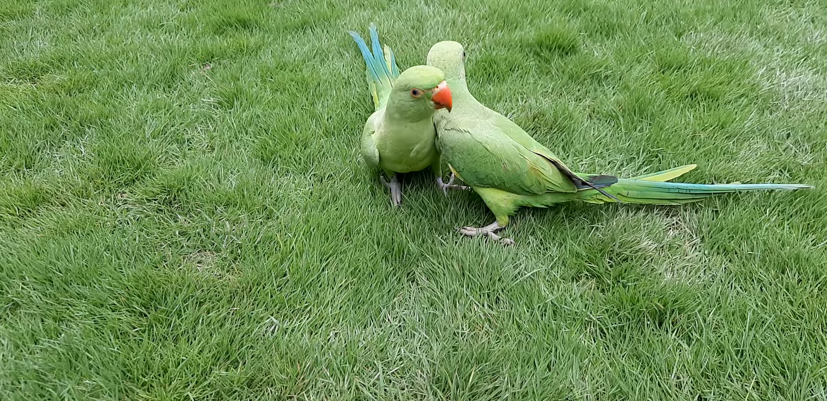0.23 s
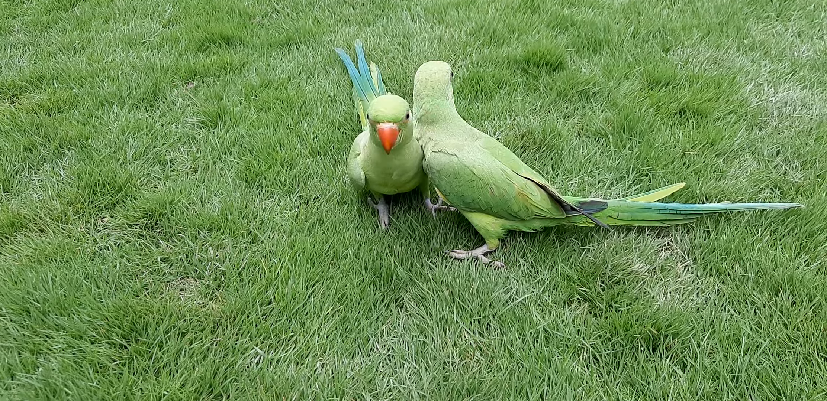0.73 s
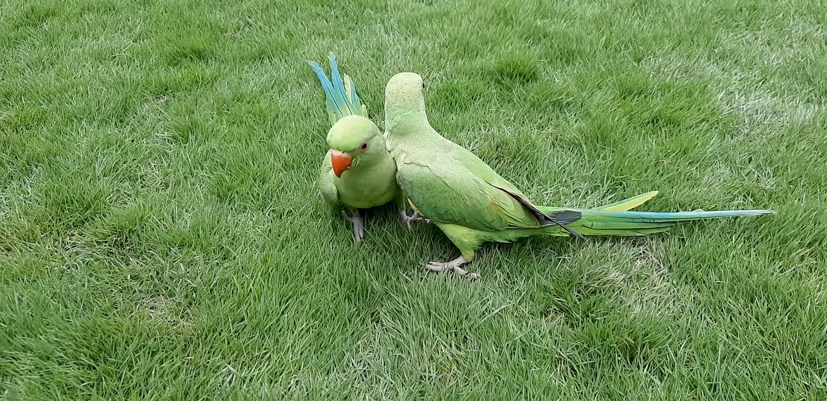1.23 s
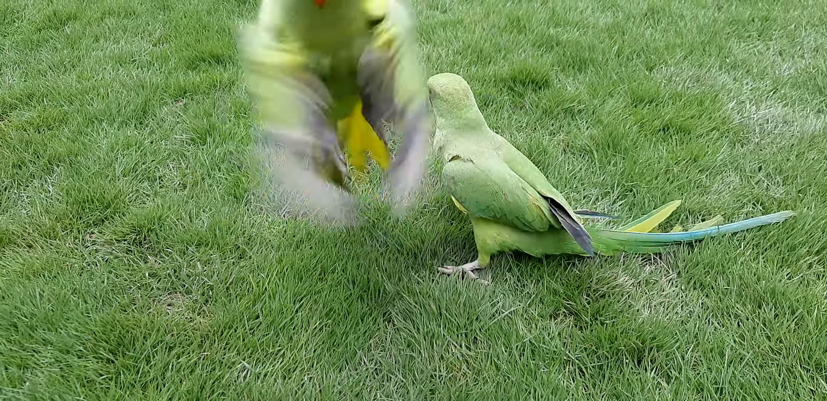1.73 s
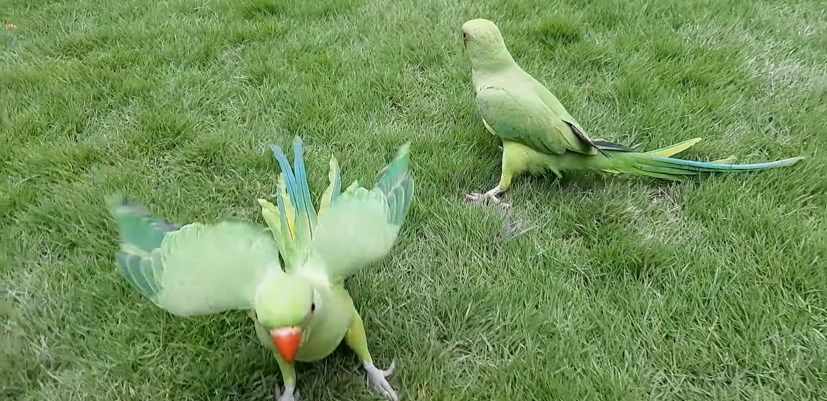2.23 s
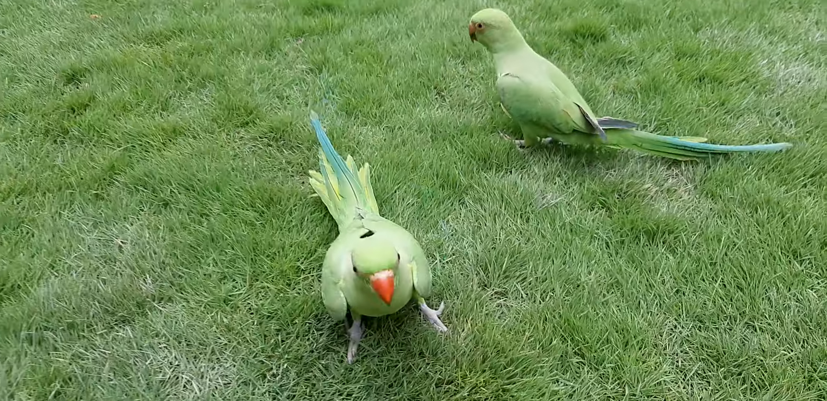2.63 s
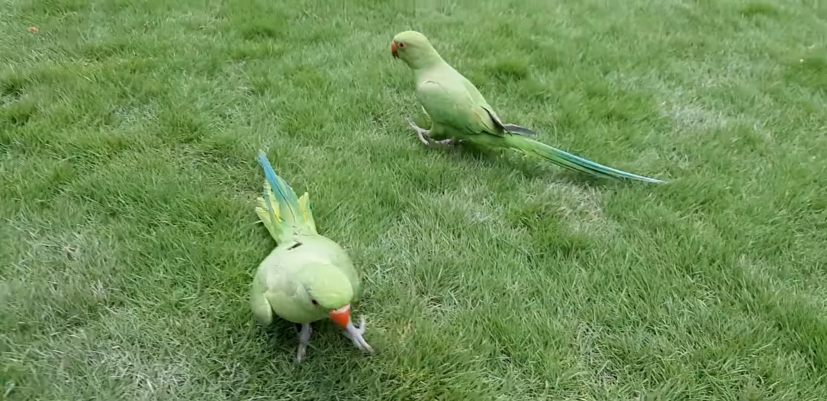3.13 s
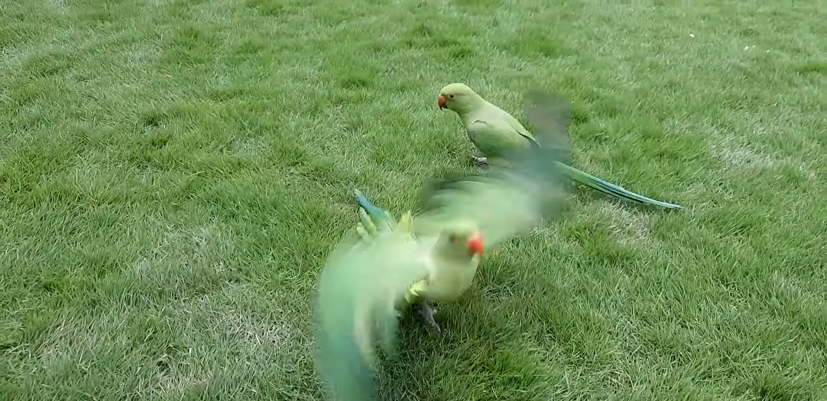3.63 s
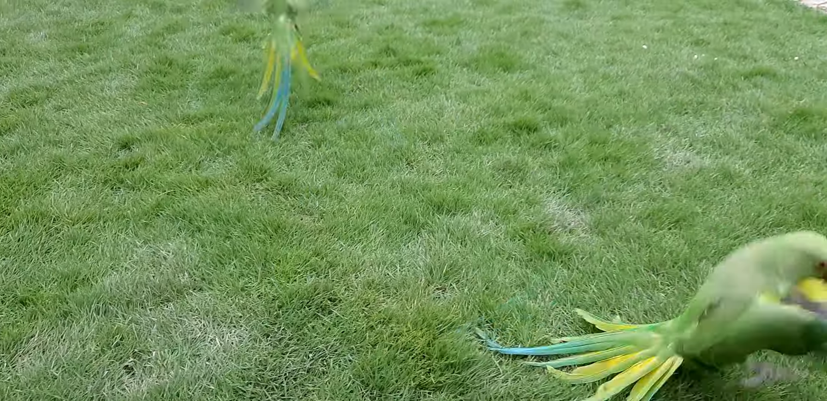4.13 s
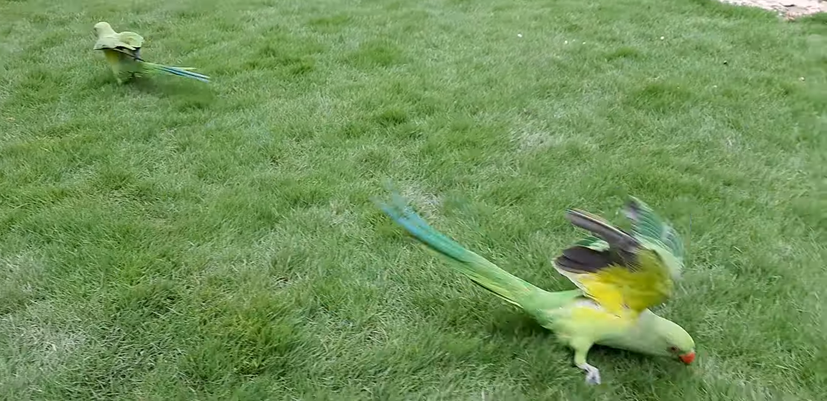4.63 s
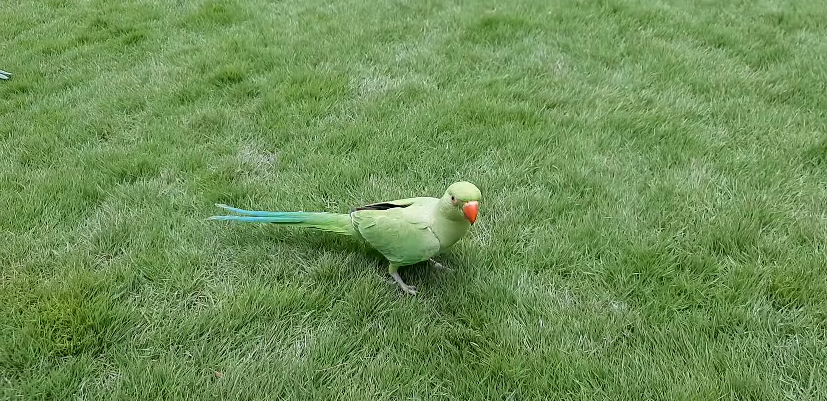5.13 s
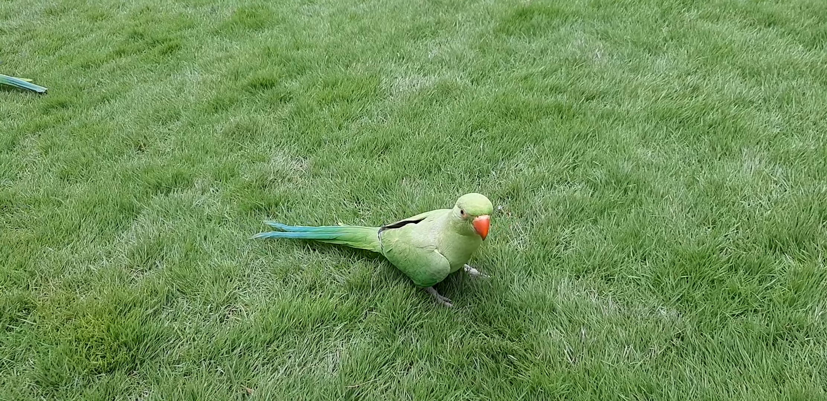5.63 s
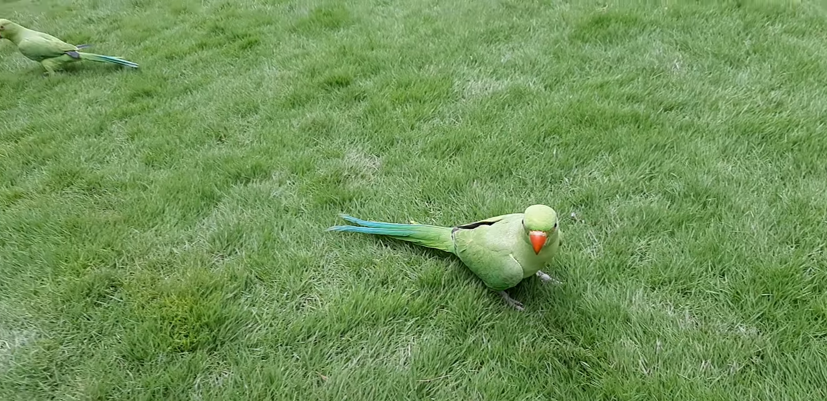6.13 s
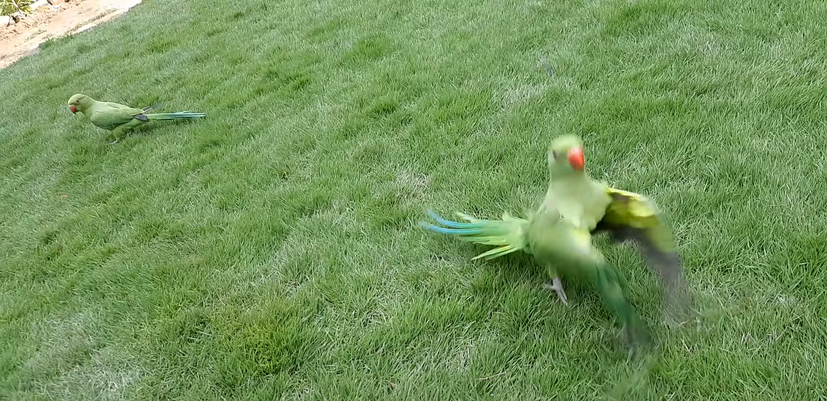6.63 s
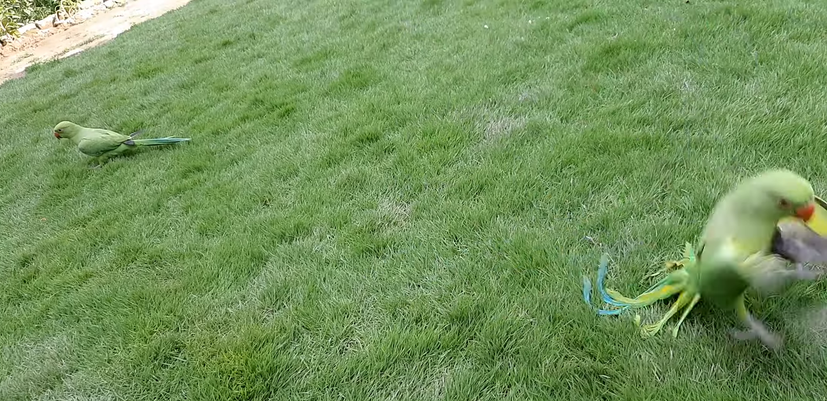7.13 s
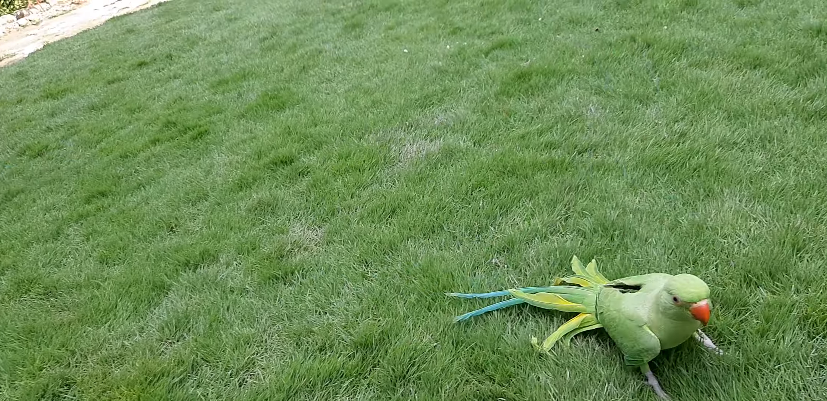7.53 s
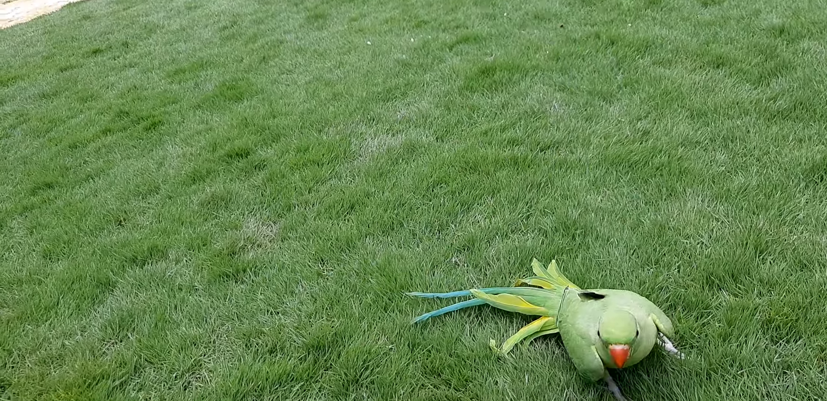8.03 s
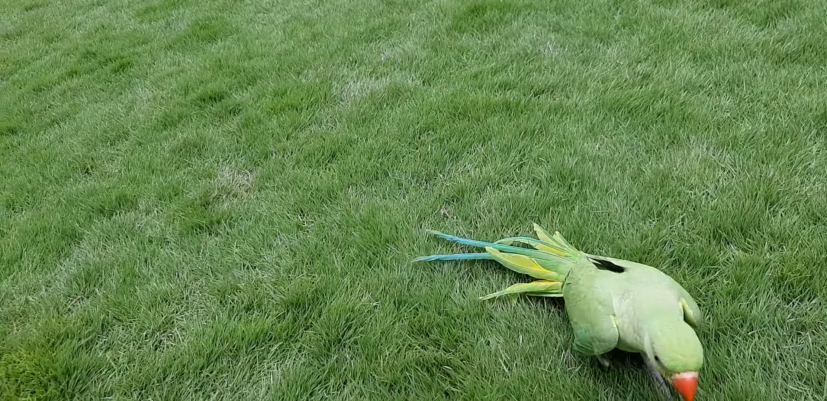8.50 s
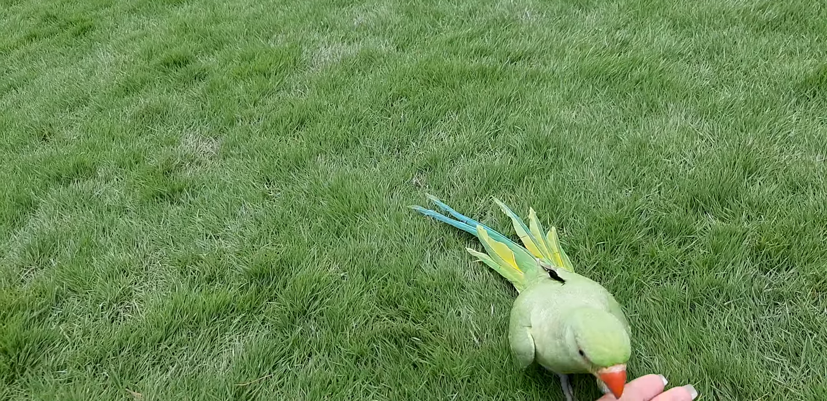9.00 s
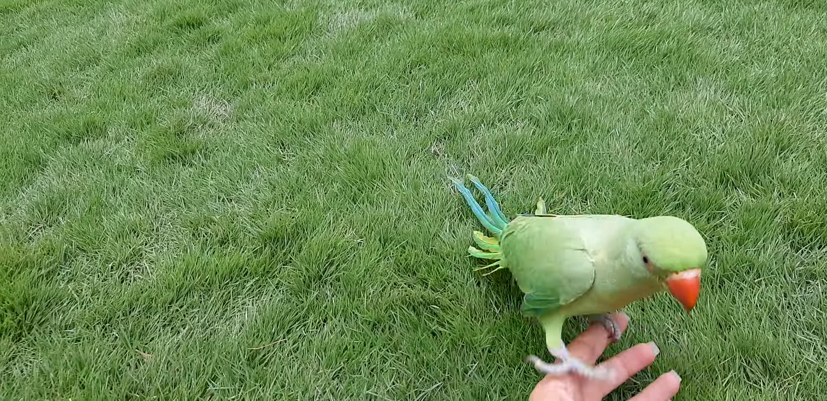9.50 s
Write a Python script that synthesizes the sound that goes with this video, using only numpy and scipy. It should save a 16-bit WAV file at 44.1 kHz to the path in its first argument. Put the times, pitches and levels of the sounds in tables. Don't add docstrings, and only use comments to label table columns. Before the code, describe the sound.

Parakeet wings clap sharply in three short flights over a lawn, with two brief raspy whistled calls above a steady machine hiss and whine.

```python
import sys
import numpy as np
from scipy import signal
from scipy.fft import rfft, irfft
from scipy.io import wavfile
from scipy.ndimage import uniform_filter1d

SR = 44100
rng = np.random.default_rng(int(sys.argv[2]) if len(sys.argv) > 2 else 0)


def transcribe(u):
    v = np.clip(np.atleast_2d(u).T, -1, 1)
    q = np.round(v * 32767).astype(np.int16)
    wavfile.write(sys.argv[1], SR, q)


def gain_from_db(level_db):
    decades = np.asarray(level_db, float) / 20
    return 10 ** decades


N = 430416
T = np.arange(N) / SR
HZ = np.fft.rfftfreq(N, 1 / SR) + 1e-3
MACHINE_LAG, WING_LAG, CALL_LAG = 20, 9, -14
WHINE_LAG = 11.5


def on_log(points, hz=HZ):
    return np.interp(np.log(hz), np.log([p[0] for p in points]), [p[1] for p in points])


def band(x, lo_hz, hi_hz):
    y = signal.sosfilt(signal.butter(2, [lo_hz, min(hi_hz, .45 * SR)], "band", fs=SR, output="sos"), x)
    return y / np.std(y)


def noise_band(lo_hz, hi_hz):
    return band(rng.standard_normal(N), lo_hz, hi_hz)


def walk(rate):
    count = int(T[-1] * rate) + 2
    y = np.interp(T * rate, np.arange(count), rng.standard_normal(count))
    return y / np.std(y)


def add(out, s, sound):
    i = int(s * SR)
    out[..., i:i + sound.shape[-1]] += sound[..., :N - i]


# frequency in Hz, left minus right in dB.
LEFT_SHADE = [(60, -0.5), (300, 0), (700, -1), (1300, -1), (2400, -4), (4400, -7.5), (8100, -11),
              (15000, -5.5)]


def shade(x, lag, share, points=LEFT_SHADE):
    left = rfft(x) * np.exp(-2j * np.pi * HZ * lag / SR) * gain_from_db(share * on_log(points))
    return np.array([irfft(left, N), x])


# time in seconds, peak in dB, left minus right in
# dB, low slap in dB, time to fade by 60 dB in seconds.
BEATS = [(1.7195, -7.5, -7, -37, .017), (1.7966, -7, -11, -28, .016), (1.877, -12, -2, -34, 0.024),
         (1.955, -17, -2, -34.5, 0.025), (2.032, -14, -4, -37.5, 0.013),
         (3.7263, -11.5, -2.5, -39.5, 0.037), (3.8122, -9, -7, -29, 0.02), (3.892, -7, -7, -30, 0.019),
         (3.9717, -2, -8, -34, .01), (4.053, -7.5, -6, -35.5, .013), (4.1322, -4, -7, -34, 0.014),
         (4.212, -16, -10, -41, 0.014), (6.7027, -12, -9, -41, 0.047), (6.7918, -5, -5, -37.5, 0.013),
         (6.874, -10.5, -7, -40, 0.011), (6.9534, -5.5, -6, -43, 0.011), (7.0378, 1.5, -10, -36, 0.0085),
         (7.245, -36, -4, -36, .02)]
# time in seconds, peak in dB, left minus right in dB.
TIPS = [
    (4.0698, -14, -10),
    (4.1453, -9, -17),
    (4.225, -7.5, -12),
    (4.309, -18.5, -5),
    (6.8112, -10, -13),
    (7.1178, -10, -9),
    (7.1302, -8, -11),
    (7.199, -15, -7),
]
# time in seconds, peak in dB, left minus right in dB,
# time to fade by 60 dB in seconds, ring in Hz.
RUSTLES = [(2.1316, -15.5, -2, .029, 7000), (2.8267, -26, -8, .012, 8900), (4.1716, -24, -6, .036, 5060),
           (4.2843, -20.5, -11, 0.041, 5660), (4.502, -21.5, -12, 0.036, 5750),
           (4.5243, -25, -20, .036, 5000), (4.586, -25, -13, .048, 5300), (4.6126, -20.5, -12, .032, 5800),
           (5.727, -34, -2, .014, 11000), (7.268, -18, -7, .04, 6200), (7.2973, -21, -10, .04, 6700),
           (7.5592, -20, -6, .02, 6600), (7.6432, -22.5, -3, 0.014, 6800), (7.8034, -21.5, 0, 0.012, 6200)]


def strokes():
    ring_hz = 5820 * (1 + 0.049 * rng.standard_normal(len(BEATS)))
    beats = [(*beat, hz) for beat, hz in zip(BEATS, ring_hz)]
    tips = [(s, db, left_db, db - 39.5, .007, 6200) for s, db, left_db in TIPS]
    rustles = [(s, db, left_db, db - 34, t60, hz) for s, db, left_db, t60, hz in RUSTLES]
    return beats + tips + rustles


def claps():
    out, t = np.zeros((2, N)), T[:2600]
    for s, db, left_db, slap_db, t60, hz in strokes():
        chance = rng.standard_normal((4, len(t)))
        length = max(t60, .003)
        fade = np.exp(-np.log(1000) * (t / (1.17 * length)) ** 0.91)
        fade = fade * np.clip(t / (0.093 * length), 0, 1)
        burst = gain_from_db(14 * np.abs(uniform_filter1d(chance[1], size=5)))
        snaps = chance[0] * burst * fade
        scattered = snaps * np.sign(uniform_filter1d(chance[2], size=15))
        ears = []
        for v in (np.roll(0.11 * snaps + scattered, WING_LAG), snaps):
            ring = band(v, 0.66 * hz, 1.27 * hz)
            ears.append(ring + 0.66 * band(v, 1800, 10600) + 0.61 * band(v, 8300, 12700))
        ears = np.array(ears) / np.max(np.abs(ears[1]))
        ears = ears * gain_from_db(np.array([[left_db], [0]]))
        slap = band(chance[3], 290, 1550) * np.exp(-t / 0.0024) * np.clip(t / 0.0014, 0, 1)
        add(out, s - .0003, gain_from_db(db) * ears + gain_from_db(slap_db + 11.0) * slap)
    return out


# take-off in seconds, hardest moment in seconds, landing in seconds,
# effort in dB, downwash toward the phone in dB.
FLIGHTS = [
    (1.59, 1.97, 2.32, -43, -1.5),
    (3.668, 3.99, 4.4, -45.5, -5),
    (6.642, 6.965, 7.31, -44.5, -4),
]


def flights():
    out = 0
    beat_rate_hz = 12.4
    gust = noise_band(59, 122)
    own = np.array([noise_band(25, 270) for _ in range(2)])
    whoosh = noise_band(104, 790) * gain_from_db(1.7 * walk(30))
    hiss = np.array([noise_band(5000, 15000) * gain_from_db(2.5 * walk(60)) for _ in range(2)])
    hiss = hiss * gain_from_db(np.array([[-3.], [4.]]))
    for start, hardest, end, db, wash_db in FLIGHTS:
        gate = np.interp(T, [start, start + 0.066, end - .08, end], [0, 1, 1, 0])
        effort = gate * gain_from_db(np.interp(T, [start, hardest, end], [-3, 0, -6]))
        wash_fade_db = np.interp(T, [hardest, end], [0, -5])
        wash = (gust + 0.56 * own) * gain_from_db(wash_db + 1.9 * walk(16) + wash_fade_db)
        feather_db = -49.5 + 3 * np.cos(2 * np.pi * beat_rate_hz * (T - hardest))
        out = out + effort * (gain_from_db(db) * (wash + gain_from_db(-0.7) * whoosh) + gain_from_db(feather_db) * hiss)
    return out


# time in seconds, peak in dB, pitch in Hz.
THUMPS = [(1.699, -40, 145), (1.79, -36, 108), (1.879, -35, 116), (1.935, -35, 164), (1.979, -40, 102),
          (2.029, -38, 557), (3.808, -41, 214), (3.939, -40, 106), (4.006, -33, 330), (4.089, -33, 240),
          (4.166, -36, 302), (4.248, -37, 200), (4.329, -40, 246), (5.149, -42, 394), (7.244, -36, 533),
          (7.579, -40, 287.4), (8.359, -38, 373), (9.574, -45, 340)]


def thumps():
    out, t = np.zeros(N), T[:1500]
    for s, db, hz in THUMPS:
        swell = (t / 0.0029) * np.exp(1 - t / 0.0032)
        add(out, s, gain_from_db(db) * np.sin(2 * np.pi * hz * t) * swell)
    return out


# frequency in Hz, left minus right in dB.
CALL_SHADE = [(2000, 3.5), (2900, -1.5), (3400, -1), (4100, 7), (4700, -21), (6500, -5.5), (10000, -7.5)]


def calls():
    tone = whistles()
    breath = noise_band(2500, 9000) * uniform_filter1d(np.abs(tone), size=90) * gain_from_db(-22)
    voice = tone + breath + rasps()
    smear = []
    for _ in range(2):
        echoes = rng.standard_normal(8000) * np.exp(-T[:8000] / .04)
        smear.append(signal.fftconvolve(voice, echoes)[:N])
    return shade(voice, CALL_LAG, 1, CALL_SHADE) + gain_from_db(-50) * np.roll(smear, 200, axis=1)


# time in seconds, pitch in Hz, effort in dB.
NOTES = [
    [(5.388, 3270, -12), (5.391, 3305, -10), (5.398, 3420, -6.5), (5.405, 3397, -10.5), (5.416, 3330, -9),
     (5.427, 3200, -12), (5.435, 3010, -15), (5.445, 2830, -11)],
    [(5.448, 2120, -17), (5.46, 1990, -19), (5.475, 1730, -14), (5.482, 1590, -17), (5.486, 1480, -22),
     (5.495, 1270, -19.5)],
    [(5.627, 3120, -32), (5.633, 3010, -16), (5.639, 2930, -24), (5.647, 2630, -19)],
    [(5.649, 2030, -25), (5.658, 1930, -19.5), (5.678, 1720, -18), (5.702, 1526, -21.5), (5.709, 1472, -18),
     (5.723, 1224, -26)],
]
HIGH_PARTIALS_DB = [0.5, -4.5, -14, -26, -40]
LOW_PARTIALS_DB = [-5, -1, -12, -11.5, -18]


def whistles():
    out, jitter, shimmer = np.zeros(N), walk(500), walk(360)
    for note in NOTES:
        s, hz, effort_db = np.transpose(note)
        span = slice(int((s[0] - .01) * SR), int((s[-1] + .01) * SR))
        t = T[span]
        pitch = uniform_filter1d(np.interp(t, s, hz), size=120)
        phase = 2 * np.pi * np.cumsum(pitch) / SR + 0.11 * jitter[span]
        gate = np.interp(t, [s[0] - .0015, s[0], s[-1], s[-1] + 0.002], [0, 1, 1, 0])
        gate = gate * gain_from_db(np.interp(t, s, effort_db) + .6 * shimmer[span])
        partials_db = HIGH_PARTIALS_DB if hz[0] > 2400 else LOW_PARTIALS_DB
        for k, db in enumerate(partials_db, start=1):
            if k * hz.max() < 14500:
                partial = np.sqrt(2) * gain_from_db(db) * np.sin(k * phase)
                out[span] += gate * throat(k * pitch) * partial
    return out


# frequency in Hz, width in Hz, level in dB.
THROAT = [(2000, 290, -10), (2570, 400, -7.5), (3320, 445, 0.5), (4030, 510, -0.5), (4670, 540, 11.5),
          (6400, 1200, -7), (7670, 730, -3.5), (10000, 1300, -4), (12000, 700, 4), (13200, 500, -14)]


def throat(hz):
    floor_db = -30
    peaks = sum(gain_from_db(2 * db) / (1 + (2 * (hz - f) / w) ** 6) for f, w, db in THROAT)
    return np.sqrt(gain_from_db(2 * floor_db) + peaks)


# start in seconds,
# end in seconds, first level in dB, last level in dB, throat pitch at the start in Hz.
OPENING = [
    (5.372, 5.382, -24, -14, 2900),
    (5.602, 5.615, -24, -17, 3900),
]
BREAKING = [
    (5.382, 5.388, -8, -17, 3200),
    (5.6155, 5.624, -17, -15, 2800),
]
CLOSING = [
    (5.477, 5.485, -26, -22, 4600),
    (5.624, 5.629, -27, -29, 4500),
    (5.696, 5.706, -32, -30, 4800),
]


def rasps():
    out = np.zeros(N)
    for rows, rate, to_hz in ((OPENING, 755, 3300), (BREAKING, 1100, 4350), (CLOSING, 850, 4500)):
        for start, end, first_db, last_db, from_hz in rows:
            chance = rng.standard_normal((20, 3))
            times = start + np.cumsum(np.clip(1 + .2 * chance[:, 0], .3, 2)) / rate
            for s, (_, size, tune) in zip(times[times < end], chance):
                way = (s - start) / (end - start)
                hz = (from_hz + way * (to_hz - from_hz)) * (1 + .07 * tune)
                db = first_db + way * (last_db - first_db) + 3.3 * np.clip(size, -1, 1)
                add(out, s, gain_from_db(db) * closure(hz))
    return signal.sosfilt(signal.butter(4, [2000, 13200], "band", fs=SR, output="sos"), out)


def closure(hz):
    t = T[:150]
    turn = 2 * np.pi * t
    throat_ring = np.exp(-t / .0007) * np.sin(hz * turn)
    beak = np.exp(-t / .0005) * (.7 * np.sin(5000 * turn) + .4 * np.sin(2400 * turn))
    edge = 0.11 * t / 0.00018 * np.exp(-t / 0.00044) * (np.sin(10000 * turn) + np.sin(12500 * turn))
    return throat_ring + beak + edge


# time in seconds, blade tone in Hz, level in dB.
MOTOR = [(0.15, 859, -50), (0.2, 855, -47.5), (1.61, 854, -46), (2.25, 862, -48.5), (2.46, 856.7, -58),
         (2.94, 854.8, -52.5), (3.08, 856.4, -61), (3.66, 848, -48), (4.35, 844, -46), (4.75, 844, -49),
         (5.23, 851, -44.5), (5.33, 845.5, -46.5), (7.12, 849.7, -48), (8.9, 849.3, -55.5),
         (9.62, 852, -52.5), (9.7, 852, -52)]


def whine(ratio, db, flutter_db):
    hz = ratio * np.interp(T, *np.transpose(MOTOR)[:2])
    phase = 2 * np.pi * np.cumsum(hz) / SR + 0.26 * walk(12)
    tone = np.sqrt(2) * np.sin(phase) * gain_from_db(db + flutter_db * walk(14))
    return shade(tone, WHINE_LAG, 0.55)


# start in seconds, end in seconds, level in dB.
SWELLS = [
    (-.3, 0.747, -61.5),
    (0.699, 1.9, -57.5),
    (4.598, 5.85, -53.5),
    (5.9, 6.601, -58),
    (8.046, 9.005, -56),
    (9.45, 10.2, -56),
]


def motor():
    low, swell_s = gain_from_db(-63.5), 0.33
    for a, b, db in SWELLS:
        low = low + gain_from_db(db) * np.interp(T, [a, a + swell_s, b - swell_s / 2, b], [0, 1, 1, 0])
    blade_db = np.interp(T, *np.transpose(MOTOR)[::2]) + 2.26
    return whine(1, blade_db, flutter_db=0.23) + low * whine(.478, 0, flutter_db=1.5)


# frequency in Hz, dB per Hz.
HISS = [(38, -104), (65, -89), (140, -80), (450, -81.5), (750, -74.5), (950, -73), (1300, -83.5),
        (2300, -72.5), (2900, -75.5), (3300, -74), (6500, -80), (8300, -92), (12000, -91), (15500, -100)]
# frequency in Hz, width in Hz, dB per Hz.
DUCT = [(555.5, 21.4, -74.5), (676, 6.8, -63.5), (722, 24.5, -65), (808, 75, -68.5), (1442, 5.1, -65),
        (1690, 21, -73), (1944, 19, -68.5), (2320, 19, -63.5), (2622, 43, -66.5), (3168, 82, -68),
        (4048, 57, -68.5), (5085, 114, -74.5), (6700, 310, -80.5)]
# frequency in Hz, likeness from 0 to 1.
LIKENESS = [(60, 1), (300, 1), (600, 0.59), (950, 1), (1500, 0.43), (3000, 0.19), (7000, 0), (9000, 0)]
# time in seconds, level in dB.
LOAD = [(.35, -1), (1.5, 0), (2.3, 0), (3.5, 0), (4.5, 1), (6.5, 0), (7.45, -1), (8.15, -2.5), (8.7, 2),
        (9.76, 1)]
LOAD_SHARE = [1.05, 0.96, 0.48, .1]
# time in seconds, level in dB.
TRAFFIC = [(.35, 0.5), (2.3, 1.5), (4.5, 0), (5.3, -3.5), (6.6, -1.5), (7.45, 5), (8.15, -4.5),
           (9.76, -1.5)]


def machine():
    peaks = sum(gain_from_db(2 * db) / (1 + (2 * (HZ - f) / w) ** 4) for f, w, db in DUCT)
    power = gain_from_db(2 * on_log(HISS)) + peaks
    right, other = (rfft(rng.standard_normal(N)) * np.sqrt(power * SR / 2) for _ in range(2))
    late = right * np.exp(-2j * np.pi * HZ * MACHINE_LAG / SR)
    like = np.clip(on_log(LIKENESS), 0, 1)
    left = (like * late + np.sqrt(1 - like ** 2) * other) * gain_from_db(on_log(LEFT_SHADE))
    both = np.array([left, right])
    load_db = np.interp(T, *np.transpose(LOAD))
    swells_db = [np.interp(T, *np.transpose(TRAFFIC))] + [share * load_db for share in LOAD_SHARE]
    centres = np.log([200, 700, 2500, 6000, 11000])
    out = 0
    for k, db in enumerate(swells_db):
        part = np.interp(np.log(HZ), centres, np.eye(5)[k])
        out = out + irfft(both * part, N) * gain_from_db(db + 0.72 * walk(12))
    return out


# frequency in Hz, level in dB.
IDLER = [(80.7, -63), (630, -59), (737.5, -49), (1593, -54.5), (1771, -59), (2067, -54.5)]


def idler():
    lines = 0
    for hz, db in IDLER:
        lines = lines + gain_from_db(db + 1.2 * walk(6)) * np.sin(2 * np.pi * hz * T + .6 * walk(8))
    leaving = np.interp(T, [3.5, 4.2], [1, 0])
    return shade(np.sqrt(2) * lines * leaving, WHINE_LAG, 5.0)


# start in seconds, end in seconds, pitch in Hz, level in dB.
SQUEAK = [
    (2.7, 2.95, 3140, -43),
    (3.04, 3.33, 5070, -44),
    (3.55, 3.8, 2625, -44),
    (3.1, 3.3, 8700, -58),
    (3.08, 3.28, 9500, -60),
    (4.86, 5.0, 9450, -58),
]


def squeal():
    tones = 0
    for a, b, hz, db in SQUEAK:
        gate = np.interp(T, [a, a + .05, b - .05, b], [0, 1, 1, 0])
        tones = tones + gain_from_db(db + 1.5 * walk(27.5)) * np.sin(2 * np.pi * hz * T) * gate
    return shade(tones, MACHINE_LAG, 1)


def scene():
    low_pass = signal.ellip(8, .3, 50, 15850, fs=SR, output="sos")
    air = signal.sosfilt(low_pass, machine() + flights())
    return claps() + air + thumps() + calls() + motor() + idler() + squeal()


def band_limit(x):
    return signal.sosfilt(signal.butter(12, 16970, fs=SR, output="sos"), x)


def record(dry):
    rounded = dry / (1 + np.abs(dry / 1.05) ** 4) ** .25
    start_s = .0697
    return band_limit(rounded * (T > start_s))


dry = scene()
out = record(dry)
transcribe(out)
```